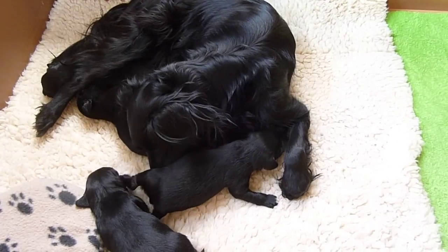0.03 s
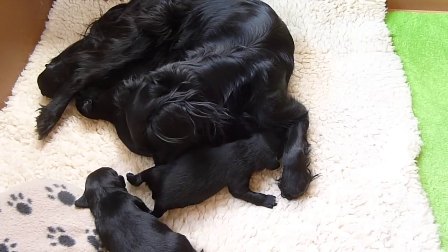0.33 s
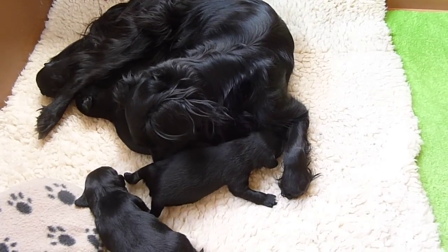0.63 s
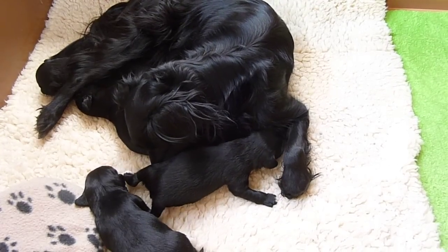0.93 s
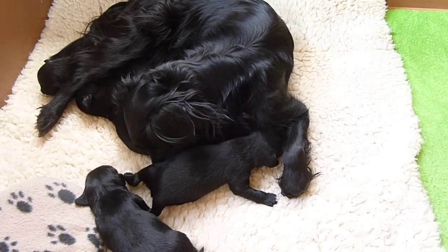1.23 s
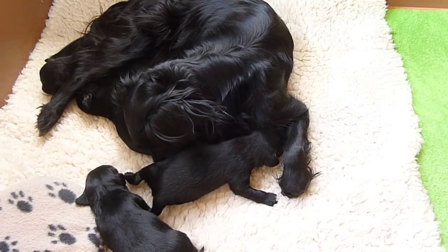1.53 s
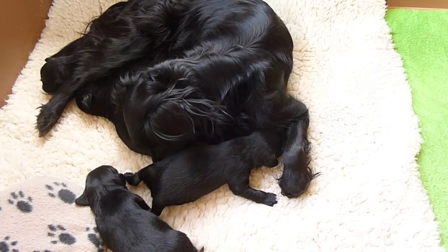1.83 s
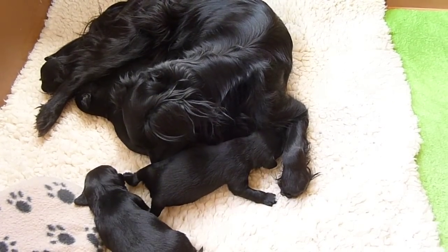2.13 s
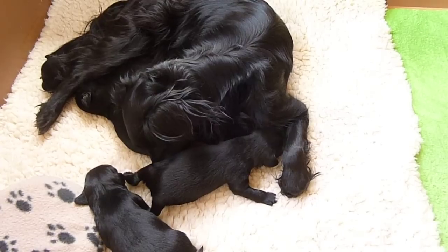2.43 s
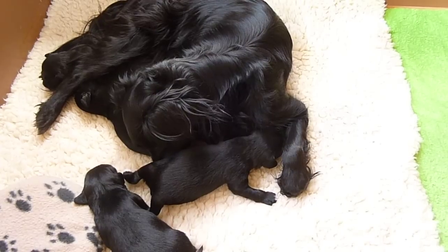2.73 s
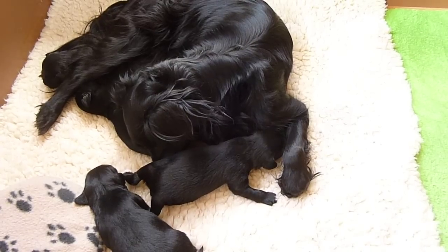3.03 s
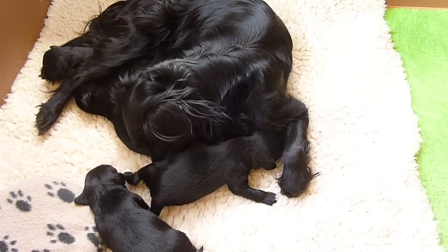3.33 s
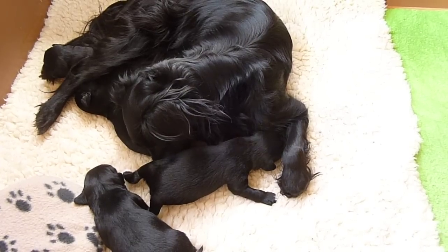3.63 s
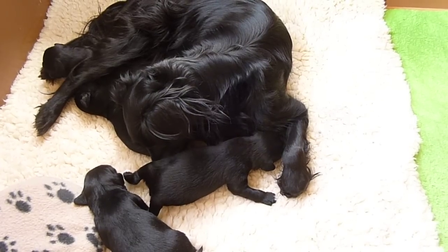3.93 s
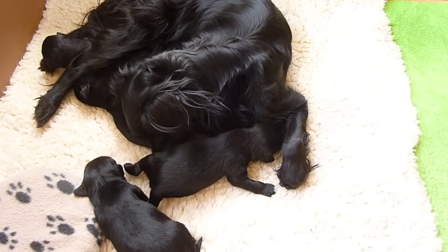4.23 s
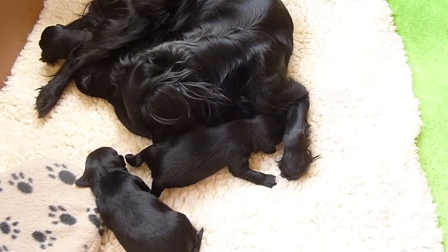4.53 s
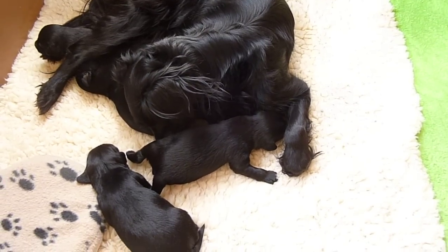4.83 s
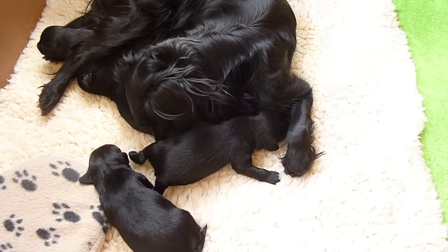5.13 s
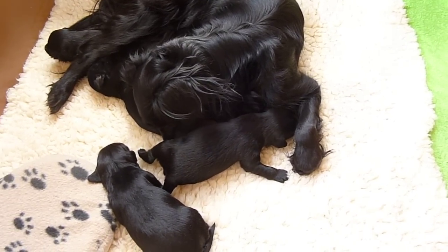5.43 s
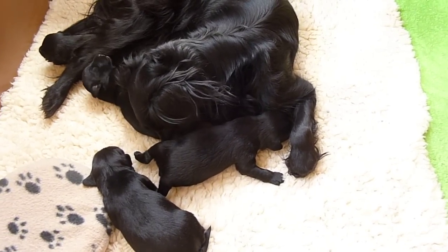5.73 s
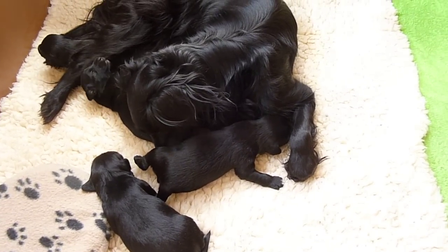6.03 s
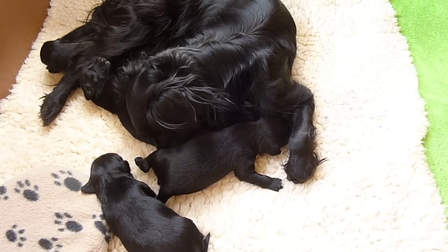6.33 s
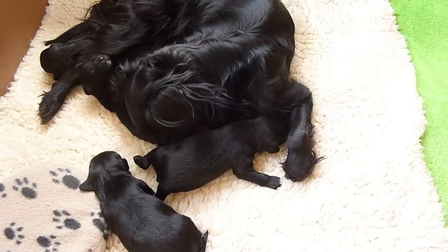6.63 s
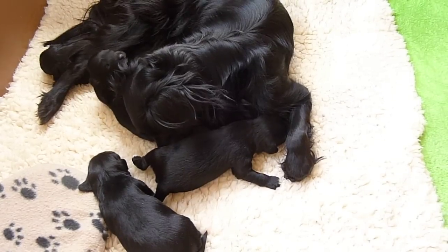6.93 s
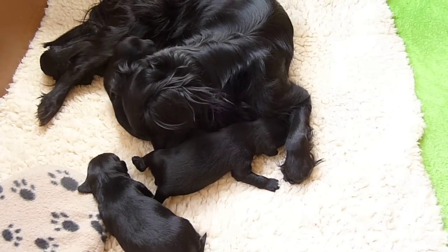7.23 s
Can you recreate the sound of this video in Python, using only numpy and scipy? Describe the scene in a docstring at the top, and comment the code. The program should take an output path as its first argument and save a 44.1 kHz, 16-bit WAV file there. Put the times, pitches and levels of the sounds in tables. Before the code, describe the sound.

At first there is only soft indoor hiss, with a faint whirr and a low drone that comes and goes. Then a nursing puppy is heard nearby: short, wet mouth clicks and little rounded smacks, uneven in strength, roughly two a second. A few dull thuds come as the dogs move on their fleece bedding, one clearly heavier, while the suckling carries on. The room sounds fairly dry.

```python
"""A quiet room: hiss, a low hum, a drone that comes and goes and a faint fluttering whirr.
After two seconds a puppy starts to suckle at its resting mother on a fleece blanket. About twice a
second the seal slips, snaps open and the tongue lets go of the teat: saliva films burst in wet ticks
and the open mouth sometimes gives a hollow smack. Meanwhile the dogs shift with a few soft bumps,
the heaviest near 5.6 s, and the suckling carries on to the end."""
import sys
import numpy as np
from scipy import signal
from scipy.fft import rfft, irfft
from scipy.io import wavfile
from scipy.ndimage import uniform_filter1d

SR = 44100
rng = np.random.default_rng(int(sys.argv[2]) if len(sys.argv) > 2 else 0)


def file_out(sig):
    """Save sig as 16-bit WAV at sys.argv[1]."""
    # one column per channel
    cols = np.atleast_2d(sig).T
    # limit, then scale
    lim = np.clip(cols, -1, 1)
    pcm = np.round(lim * 32767).astype(np.int16)
    wavfile.write(sys.argv[1], SR, pcm)


N = 321489
TIME = np.arange(N) / SR

# colour of the room and microphone hiss: (frequency [Hz], relative level [dB])
HISS_SPECTRUM = [(20, -10.5), (35, -5.5), (100, -0.5), (220, 0.5), (400, -3), (580, -4.5), (1000, -7.5),
                 (1400, -9.5), (2000, -13.5), (3000, -17), (5000, -19.5), (7300, -21), (8000, -26.5),
                 (8700, -42)]
# mains hum and electronic whine: (frequency [Hz], level [dB])
HUM_TONES = [(49.5, -66.5), (6666, -82), (7500, -89), (7530, -86.5)]
# fader ride of the low drone: (time [s], relative level [dB])
DRONE_RIDE = [(0.0, -74), (1.5, -54), (1.64, -63), (2.07, -51.5), (2.52, -67), (2.82, -57.5), (3.5, -74.5),
              (4.3, -66), (7.29, -72)]
# fader ride of the whirr's weak flutters, with one long lull: (time [s], level [dB])
FLUTTER_RIDE = [(0, -48.5), (1.0, -50.5), (1.8, -55.5), (2.5, -53.5), (2.9, -50.5), (4.2, -51.5),
                (4.9, -49), (5.5, -53.5), (7.29, -49.5)]
# accents in the whirr: (time [s], level [dB])
STRONG_FLUTTERS = [(0.172, -47.5), (0.407, -46), (0.554, -47), (1.178, -47), (1.513, -46.5), (2.972, -47),
                   (3.504, -49.5), (3.807, -48.5), (4.628, -46), (4.985, -51), (5.019, -46), (5.254, -44.5),
                   (6.466, -45), (6.826, -49)]
# resonances of the whirr: (frequency [Hz], width [Hz], relative level [dB])
WHIRR_MODES = [(710.3, 86, 1), (824, 220, -3), (971, 148, -2), (1199, 122, -4), (1326, 110, -9.5)]
# cue list of the sucks, levels before the mix: (snap time [s], snap tick [dB], mouth pitch [ratio],
# snap smack [dB], slip lead [s], slip tick [dB], parting delay [s], parting tick [dB], parting smack [dB])
SUCK_CUES = [(1.938, -50, 1.03, -47, .045, -50, 0.01, -41.5, -48),
             (2.3346, -34, .98, -45, 0.028, -55, 0.0073, -43, -51),
             (2.739, -34.5, 1.01, -38, 0.0058, -45, 0.0062, -47, -45),
             (3.177, -37, 1.03, -39, 0.0049, -50, 0.014, -46, -37),
             (3.5744, -45, 1.12, -54, .008, -51, .005, -59, -54),
             (3.639, -39.5, .98, -36.5, 0.015, -44, .018, -38.5, -40),
             (4.0517, -33, 1.02, -52, 0.047, -49, 0.01, -38, -47),
             (4.5136, -25.5, 1.03, -50, .0072, -39.5, .023, -34.5, -34.5),
             (4.9045, -47.5, 1.05, -49, 0.045, -50, .01, -55, -53.5),
             (5.3309, -42, 1.0, -49, .048, -47, 0.0039, -50, -57),
             (5.8087, -38.5, 1.04, -39, .004, -52, .028, -41.5, -37),
             (6.226, -39, .97, -39.5, 0.009, -54, 0.0053, -43, -54),
             (6.4561, -49.5, .95, -46, .012, -55, 0.0086, -48, -41),
             (6.6479, -42, 1.08, -49, .026, -48, .008, -57, -54),
             (7.117, -49, .97, -40.5, 0.014, -54, 0.025, -56, -41)]
# resonances of the puppy's mouth: (frequency [Hz], relative level [dB], ring time to -60 dB [s])
MOUTH_MODES = [(1700, -14.5, .004), (2694, -8, 0.0065), (3415, -0.5, 0.0089), (4105, -1.5, 0.0036),
               (4610, -9, 0.0078), (6030, -17.5, 0.0084)]
# nudges on the bedding: (time [s], peak level [dB], low edge [Hz], high edge [Hz])
BUMP_CUES = [(2.32, -48.5, 110, 168), (3.030, -43, 221, 327), (3.046, -42, 380, 580),
             (3.562, -46.5, 146, 187), (3.694, -46, 117, 155), (4.1714, -35, 78, 271),
             (4.849, -50, 111, 168), (5.6433, -25, 126, 560)]


def from_db(db):
    """Decibels to gain."""
    return 10 ** (np.asarray(db) / 20)


def unit_rms(x):
    """Normalise to unit power."""
    return x / np.sqrt(np.mean(x ** 2) + 1e-20)


def unit_peak(x):
    """Normalise to a peak of one."""
    return x / np.max(np.abs(x))


def add(out, start_s, sound):
    """Mix a sound in at its cue."""
    start = int(start_s * SR)
    out[start:start + len(sound)] += sound[:N - start]


def resonate(x, hz, width):
    """One resonance with unity gain at its peak."""
    r = np.exp(-np.pi * width / SR)
    feedback = [1, -2 * r * np.cos(2 * np.pi * hz / SR), r * r]
    return signal.lfilter(np.array([1, 0, -1]) * (1 - r * r) / 2, feedback, x)


def noise(gain_at):
    """Noise of unit power, coloured by a gain curve over frequency."""
    hz = np.maximum(np.fft.rfftfreq(N, 1 / SR), 1)
    return unit_rms(irfft(rfft(rng.standard_normal(N)) * gain_at(hz), N))


def drift(rate_hz):
    """Smooth random wander of unit spread."""
    return noise(lambda hz: 1 / (1 + (hz / rate_hz) ** 2))


def hiss(level_db=-54):
    """An even, dark bed of room and microphone noise."""
    points_hz, db = np.transpose(HISS_SPECTRUM)
    return from_db(level_db) * noise(lambda hz: from_db(np.interp(np.log(hz), np.log(points_hz), db)))


def hum():
    """The mains hums and electronics whine in steady, pure tones."""
    return sum(from_db(db) * np.sin(2 * np.pi * (hz * TIME + rng.random())) for hz, db in HUM_TONES)


def drone(pitch_hz=75.6, waver_hz=0.96, trim_db=-2):
    """A low tone wavers in pitch as it comes and goes."""
    hz = pitch_hz + waver_hz * drift(rate_hz=1.8)
    gain = from_db(np.interp(TIME, *np.transpose(DRONE_RIDE)) + trim_db)
    return gain * np.sin(2 * np.pi * np.cumsum(hz) / SR)


def weak_flutters(gap_s=.075, jitter_share=0.27, spread_db=1.5):
    """Cues for a loose train of small swells in the whirr: (time [s], level [dB])."""
    late, strength = rng.standard_normal((int(N / SR / gap_s), 2)).T
    times = (np.arange(len(late)) + .5 + jitter_share * late) * gap_s
    levels = np.interp(times, *np.transpose(FLUTTER_RIDE)) + spread_db * strength
    return list(zip(times, levels))


def whirr(base_db=-57, flicker_db=2.5, rise_s=0.0039, fall_s=0.0096, grains_per_s=900):
    """A faint rattle of fine grains rings a few resonances that all flutter together."""
    power = from_db(base_db + flicker_db * drift(rate_hz=45)) ** 2
    for s, db in STRONG_FLUTTERS + weak_flutters():
        width_s = np.where(TIME < s, rise_s, fall_s)
        power += from_db(db) ** 2 * np.exp(-np.minimum(((TIME - s) / width_s) ** 2, 20))
    # every grain strikes each resonance with a strength of its own
    grains = rng.standard_normal((len(WHIRR_MODES), N)) * (rng.random(N) < grains_per_s / SR)
    ring = sum(from_db(db) * resonate(resonate(strikes, hz, width), hz, width)  # twice, for steep sides
               for strikes, (hz, width, db) in zip(grains, WHIRR_MODES))
    # level out the rattle, so the flutter shapes the loudness
    ring_power = uniform_filter1d(ring ** 2, size=SR // 40) + 1e-12
    return ring * np.sqrt(power / ring_power)


def sucks(smack_hz=1327, smack_spread=0.06, trail_gap_s=.0031, trail_db=-46.5, trail_follow=0.41):
    """The seal slips, snaps open, then the tongue parts from the teat: cues for ticks and smacks."""
    tick_cues, smack_cues = [], []
    usual_db = np.mean([cue[1] for cue in SUCK_CUES])
    for s, snap_db, pitch, smack_db, lead_s, slip_db, part_s, part_db, part_smack_db in SUCK_CUES:
        tick_cues += [(s - lead_s, slip_db, pitch * 1.08),  # higher: the mouth is still tight
                      (s, snap_db, pitch),
                      (s + part_s, part_db, pitch * 0.902)]
        # two ticks trail the snap and follow its strength, the second 4 dB softer
        delays = np.cumsum(trail_gap_s * rng.uniform(.8, 1.2, 2))
        first_db = trail_db + trail_follow * (snap_db - usual_db)
        tick_cues += [(s + delay, first_db - 4 * k, pitch) for k, delay in enumerate(delays)]
        hz = smack_hz * (1 + smack_spread * rng.standard_normal())
        smack_cues += [(s, smack_db, hz), (s + part_s, part_smack_db, hz * 0.988)]
    return tick_cues, smack_cues


def wet_ticks(cues, spread_db=2, detune=.02, fizz_db=-15, fizz_t60=0.0087, fizz_density=0.073):
    """Each bursting film of saliva rings the tiny mouth, and smaller films fizz after it."""
    out, t = np.zeros(N), TIME[:SR // 40]
    hz, mode_db, t60 = np.array(MOUTH_MODES).T[:, :, None]
    polarity = (-1) ** np.arange(len(MOUTH_MODES))[:, None]
    for s, db, pitch in cues:
        strength, shift = rng.standard_normal((2, len(MOUTH_MODES), 1))
        decay = from_db(mode_db + spread_db * strength - 60 * t / t60)
        modes = polarity * decay * np.sin(2 * np.pi * hz * pitch * (1 + detune * shift) * t)
        fizz = rng.standard_normal(len(t)) * (rng.random(len(t)) < fizz_density)
        burst = signal.unit_impulse(len(t)) + fizz * from_db(fizz_db - 60 * t / fizz_t60)
        add(out, s, from_db(db) * unit_peak(signal.fftconvolve(burst, modes.sum(0))))
    return out


def smacks(cues, attack_s=0.00071):
    """The opened mouth gives a lower, rounder pop."""
    out, t = np.zeros(N), TIME[:SR // 30]
    envelope = unit_peak(t * np.exp(-t / attack_s))
    for s, db, hz in cues:
        add(out, s, from_db(db) * envelope * np.sin(2 * np.pi * hz * t))
    return out


def room(send, early_db=-5, early_t60=0.08, tail_db=-12, tail_t60=0.31, echoes_per_s=2200):
    """Early reflections off the sides of the bed, then the faint tail of the room."""
    t = TIME[:SR // 3]
    arrivals = (t > .0015) & (rng.random(len(t)) < echoes_per_s / SR)
    early = rng.choice([-1, 1], len(t)) * arrivals * from_db(-60 * t / early_t60)
    tail = rng.standard_normal(len(t)) * (t > .01) * from_db(-60 * t / tail_t60)
    early *= from_db(early_db) / np.linalg.norm(early)
    tail *= from_db(tail_db) / np.linalg.norm(tail)
    return signal.fftconvolve(send, early + tail)[:N]


def bumps():
    """The fleece takes all the treble out of a nudge and leaves a short thud."""
    out, nudge = np.zeros(N), signal.unit_impulse(SR // 8)
    for s, db, low_hz, high_hz in BUMP_CUES:
        band = signal.butter(1, [low_hz, high_hz], "band", fs=SR, output="sos")
        muffle = signal.butter(10, high_hz, fs=SR, output="sos")
        thud = signal.sosfilt(muffle, signal.sosfilt(band, nudge))
        add(out, s, -from_db(db) * unit_peak(thud))
    return out


def scene(tick_trim_db=1, smack_trim_db=-0.5, bump_send_db=-8):
    """Mono mix: the dogs and their reverb over the room tone."""
    tick_cues, smack_cues = sucks()
    mouth = from_db(tick_trim_db) * wet_ticks(tick_cues) + from_db(smack_trim_db) * smacks(smack_cues)
    thuds = bumps()
    reverb = room(mouth + from_db(bump_send_db) * thuds)
    room_tone = whirr() + hiss() + hum() + drone()
    return (room_tone + mouth + thuds + reverb)[None]


def record(dry, cutoff_hz=8700, dc_offset=.0176):
    """The recorder cuts the top end steeply and sits on a small constant offset."""
    high_cut = signal.ellip(10, .1, 70, cutoff_hz, fs=SR, output="sos")
    return dc_offset + signal.sosfilt(high_cut, dry)


dry = scene()
out = record(dry)
file_out(out)
```